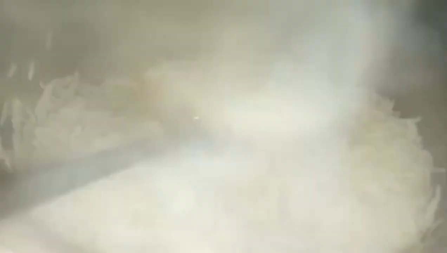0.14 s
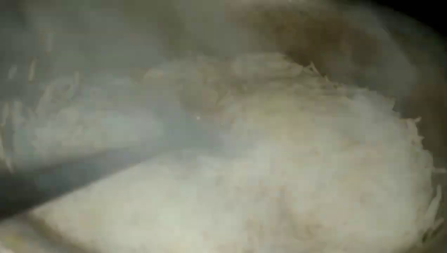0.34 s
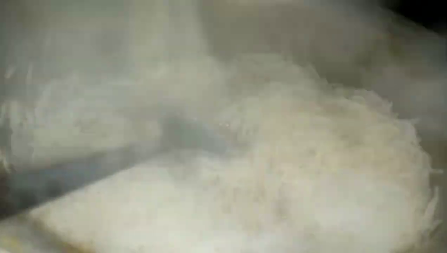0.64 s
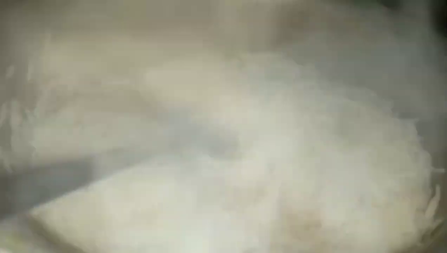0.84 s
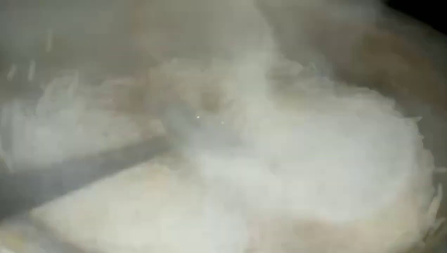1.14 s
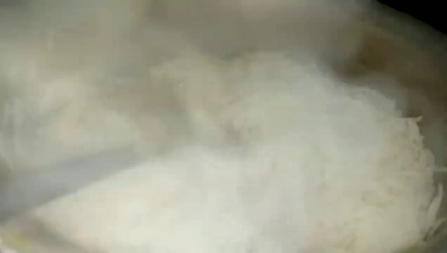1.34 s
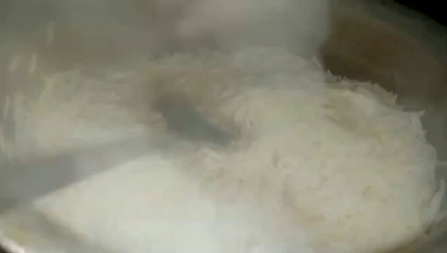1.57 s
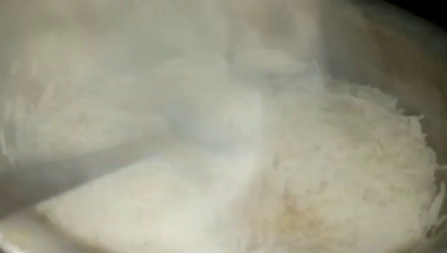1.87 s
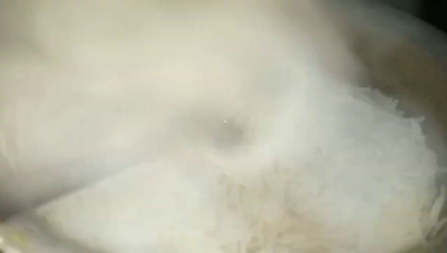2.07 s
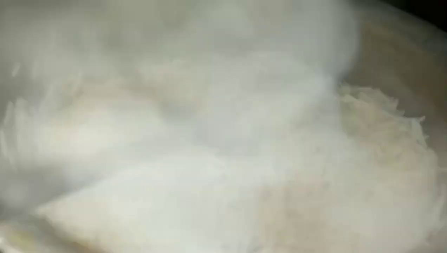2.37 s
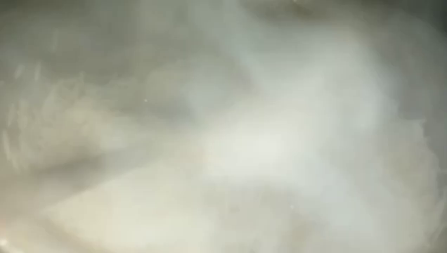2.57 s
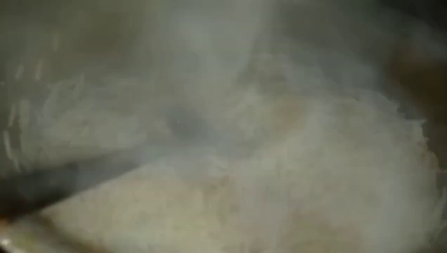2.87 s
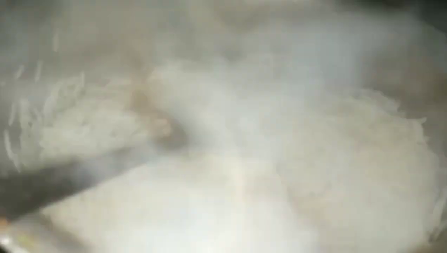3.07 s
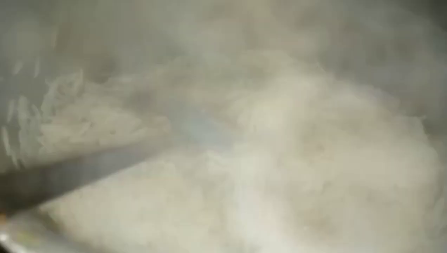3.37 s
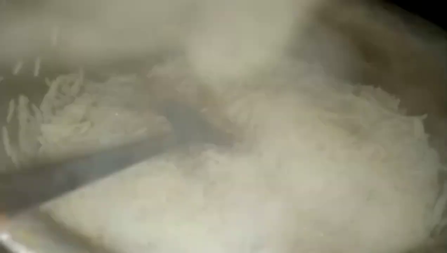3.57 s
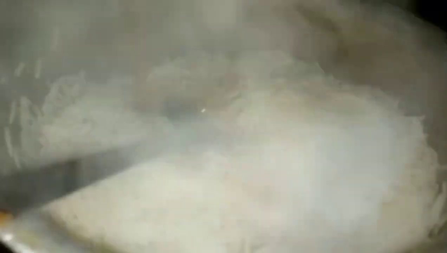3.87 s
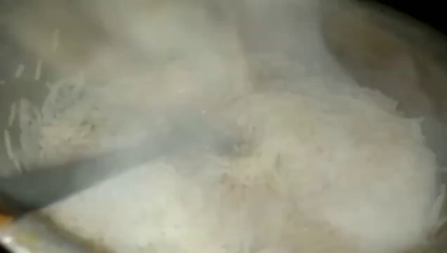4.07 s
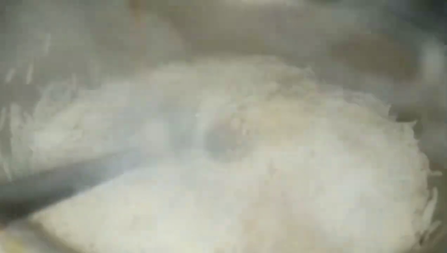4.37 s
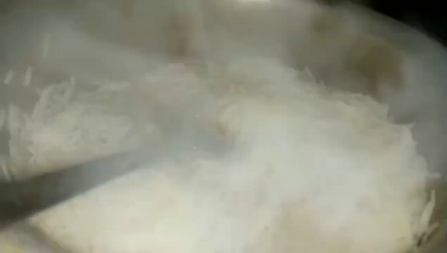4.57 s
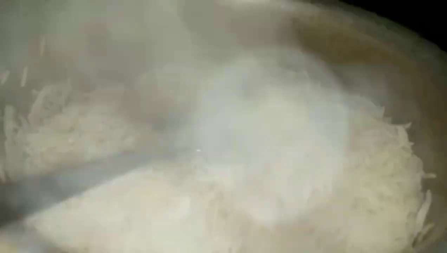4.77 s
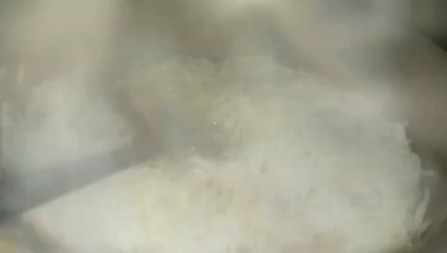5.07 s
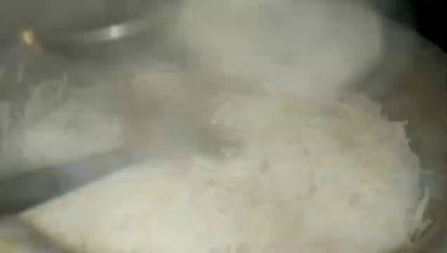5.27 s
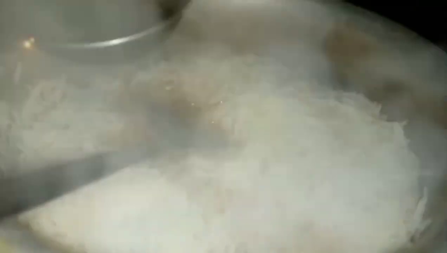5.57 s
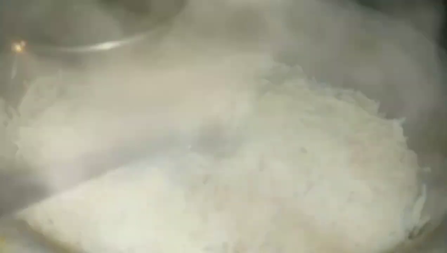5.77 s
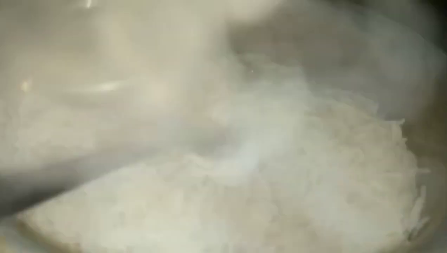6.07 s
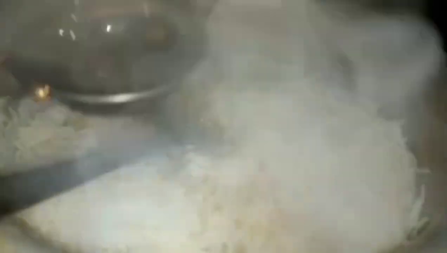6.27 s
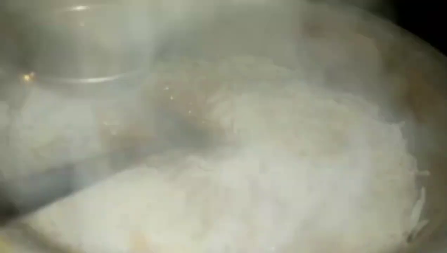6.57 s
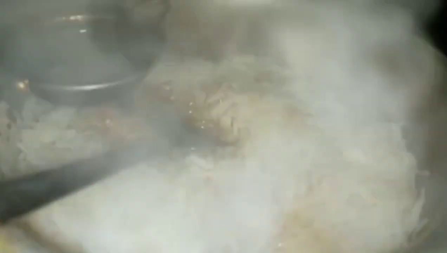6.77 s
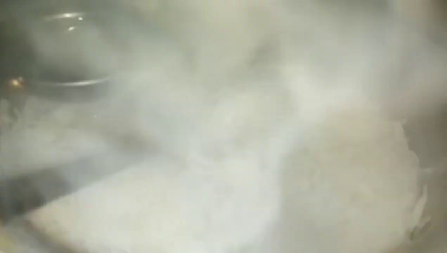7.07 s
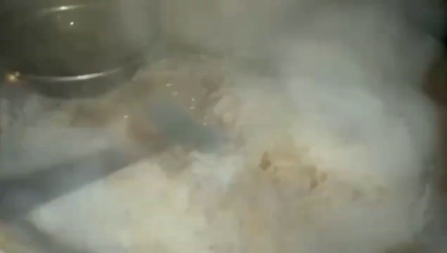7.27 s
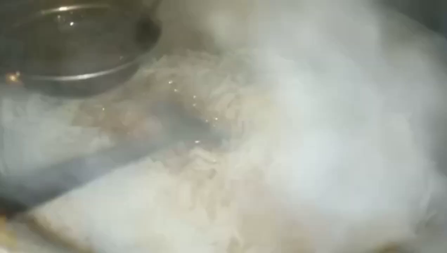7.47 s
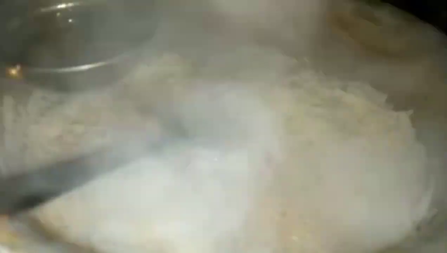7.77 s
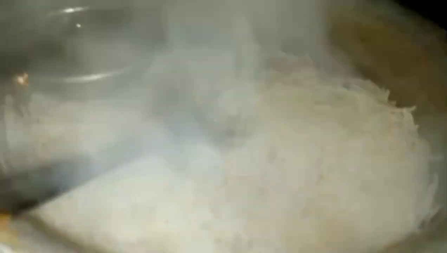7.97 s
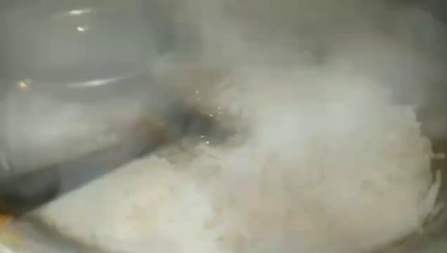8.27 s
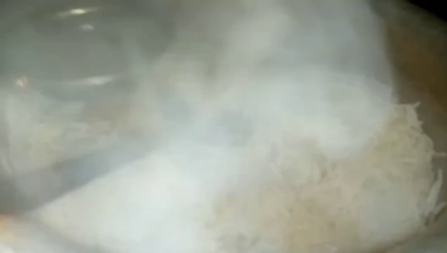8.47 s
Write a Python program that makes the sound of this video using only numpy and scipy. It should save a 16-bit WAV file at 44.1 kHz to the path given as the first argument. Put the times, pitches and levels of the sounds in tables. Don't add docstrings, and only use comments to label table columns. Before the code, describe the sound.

Close handheld capture in a home kitchen: soft burner roar and steam hiss under everything. First only tiny clicks and slides of grain, then six evenly spaced, ringing knocks of metal on a steel pot, with quick chattering bounces. A pause, then a rapid run of hard, short bowl taps shedding spice, bumping the microphone and popping it once, followed by weaker scattered taps and a last trickle of grains.

```python
import sys
import numpy as np
from scipy import signal
from scipy.fft import rfft, irfft, next_fast_len
from scipy.io import wavfile
from scipy.ndimage import uniform_filter1d, map_coordinates

SR = 44100
rng = np.random.default_rng(int(sys.argv[2]) if len(sys.argv) > 2 else 0)


def makeup_ratio(level_db):
    decades = np.asarray(level_db, float) / 20
    return 10 ** decades


def transcribe(signal):
    frames = np.atleast_2d(signal).T
    limited = np.clip(frames, -1, 1)
    pcm = np.round(limited * 32767).astype(np.int16)
    wavfile.write(sys.argv[1], SR, pcm)


N = 381004

# time_s, burner_db
BURNER = [(0, -57), (2.7, -56.5), (4.8, -55), (6.5, -55.5), (8.0, -54.5), (8.64, -55)]
# time_s, rumble_db
HANDLING = [(0, -65.5), (.8, -71.5), (2.7, -66.5), (4.5, -72), (4.85, -60.5), (5.2, -72), (5.5, -54),
            (5.7, -71), (6, -57), (6.45, -67.5), (7.1, -63), (8.64, -65)]
# frequency_hz, density_db
RUMBLE = [(15, -66), (25, -18), (65, -15.5), (92, -3), (124, -4.5), (167, 1.5), (243, -19.5), (350, -8.5),
          (460, -27), (770, -120)]
# frequency_hz, density_db
FLAME = [(180, -23), (300, -13.5), (318, -11), (395, -2.5), (519, -5), (683, 3), (1070, -11.5), (1270, 1),
         (1590, -5), (1740, -6), (1890, 0), (2020, -4), (2980, -7), (3750, -9.5), (4600, -18), (5980, -31),
         (10100, -120)]
# frequency_hz, density_db
STEAM = [(2590, -19), (4400, -1.5), (5460, -0.5), (7320, 1.5), (8270, -7.5), (9280, -15), (11100, -9),
         (12800, -16), (14100, -25), (14600, -1), (15400, -8.5), (16000, -20), (16500, -24)]
# frequency_hz, width_hz, level_db
JET = [(3850, 170, 0)]
STEAM_DB, STEAM_FOLLOWS = -63, 0.33

# start_s, clack_db, landing_db, sliding_db
TAPS = [(1.187, -48, -60, -47), (5.439, -9, -16, -25), (5.737, -16.5, -17.5, -24.5),
        (5.9767, -16.5, -21.5, -27.5), (6.1802, -11, -20, -31), (6.3928, -23.5, -25, -26.5),
        (6.5971, -20.5, -25.5, -35.5), (6.9733, -43.5, -60, -45), (7.1568, -32, -35, -38),
        (7.3296, -34.5, -34.5, -47), (7.8076, -49, -62, -49), (8.1704, -44, -44, -34),
        (8.344, -32.5, -43, -32), (8.512, -36.5, -49, -35)]
# start_s, peak_db
SKIPS = [
    (5.452, -19),
    (5.4826, -22.5),
    (5.7436, -18),
    (5.987, -20.5),
    (6.398, -21.5),
    (7.1684, -32.5),
    (8.1285, -39),
    (8.549, -39),
    (8.558, -38),
]
# start_s, peak_db
TICKS = [
    (.0135, -45),
    (0.0297, -35.5),
    (5.467, -17.5),
    (6.22, -30),
    (6.437, -24.5),
]
# start_s, peak_db
TILTS = [
    (0.001, -38.5),
    (.028, -41),
    (.2289, -39.5),
    (8.3944, -38),
    (8.548, -27),
    (8.5742, -36),
]
# start_s, peak_db, centre_hz, rise_s, t60_s
SETTLING = [
    (.67, -42, 2130, 0.012, 0.15),
    (1.709, -43.5, 4400, 0.0074, 0.19),
    (2.18, -41.5, 1440, 0.0042, 0.073),
    (8.5, -38, 613, 0.0046, 0.061),
]
# start_s, peak_db, pitch_hz
STRAYS = [
    (.003, -39, 5200),
    (.0285, -37, 5150),
    (.0455, -35, 7400),
    (0.245, -34, 5700),
    (.2605, -34, 6400),
    (7.8085, -37, 1500),
]
# frequency_hz, width_hz, level_db
BOWL = [(1310, 310, -5), (2110, 400, -3.5), (4380, 480, 0), (6350, 1460, -1.5), (7590, 500, 4),
        (9080, 840, -12), (11440, 650, -12), (14900, 1750, -7)]
FLIGHT_S = 0.018
SOFT_RING_DB, HARD_DB = (-6.5, -3), -28  # (low, middle) ring of a soft tap; taps above HARD_DB brighten
BRIGHTEN = (0.62, 0.47)
SKIP_RING_DB, LANDING_RING_DB = (-8, -5.5), (-21, -21)
SLIDE_HZ, SLIDE_HZ_PER_DB, SLIDE_RISE_S, SLIDE_T60_S = 6770, 40, 0.011, 0.17
TRICKLE_DB, TRICKLE_T60_S = -24, 0.97
STRAY_CYCLES = 13

# start_s, peak_db, glance (0 square to 1 grazing)
KNOCKS = [(2.3826, -28.5, 0.045), (2.4135, -46, .6), (2.4894, -49, 0.52), (2.8427, -25.5, 0.16),
          (2.8685, -33, 0.57), (3.336, -27, 0.09), (3.3435, -33, .3), (3.3634, -32, 1),
          (3.7316, -25.5, 0.18), (3.7408, -24, 0.13), (3.7655, -28.5, .8), (4.1063, -21, 0.024),
          (4.1116, -27.5, 0.14), (4.1693, -31, .9), (4.4692, -24.5, 0.13), (4.4767, -21.5, 0.34)]
# first_spot_db, second_spot_db, t60_s
STEEL = [(-33.0, -22.0, 0.44), (-22, -22, 0.25), (-34.0, -47.0, 1.5), (-32.0, -31.0, 1.1),
         (-25.0, -29.0, 0.61), (-33.0, -37.0, 1.5), (-23.0, -23.0, 0.59), (-20.0, -22.0, 0.57),
         (-13.0, -14.0, 0.54), (-22.0, -20.0, 0.72), (-25.0, -26.0, 0.54), (-27.0, -23.0, 0.66),
         (-17.0, -19.0, 0.42), (-25.0, -29.0, 0.56), (-13.0, -12.0, 0.65), (-14.0, -20.0, 0.52),
         (-13.0, -9.0, 0.38), (-19.0, -14.0, 0.42), (-16.0, -16.0, 0.44), (-8.0, -9.0, 0.41),
         (-24.0, -19.0, 0.53), (-9.0, -14.0, 0.36), (-19.0, -12.0, 0.47), (-17.0, -19.0, 0.5),
         (-15.0, -9.0, 0.34), (-20.0, -19.0, 0.55), (-18.0, -21.0, 0.57), (-13.0, -10.0, 0.37),
         (-17.0, -26.0, 0.39), (-11.0, -12.0, 0.42),
         (-21, -19, 0.4), (-19, -21, 0.5), (-20, -15, 0.39), (-24, -21, 0.49), (-44, -27, 0.56),
           (-30, -22, 0.41), (-33, -19, 0.41), (-23, -13, 0.44), (-17, -12, 0.4), (-25, -23, 0.44),
           (-20, -16, 0.41), (-21, -9, 0.33), (-15, -13, 0.44), (-21, -23, 0.56), (-22, -12, 0.38),
           (-21, -17, 0.45), (-17, -19, 0.42), (-25, -19, 0.41), (-20, -26, 0.5), (-25, -22, 0.44),
           (-23, -25, 0.42), (-22, -22, 0.43), (-27, -22, 0.41), (-24, -23, 0.37), (-22, -14, 0.37),
           (-30, -32, 0.56), (-21, -26, 0.37), (-22, -23, 0.35), (-21, -19, 0.35), (-29, -38, 0.42)]
STEEL_LOW_HZ = [622, 668, 929, 1023, 1125, 1336, 1653, 2211, 2270, 2328, 2405, 2639, 2672, 2752, 2854, 3061, 3106,
                3168, 3254, 3282, 3373, 3648, 3703, 3755, 3928, 4102, 4130, 4174, 4346, 4417]
STEEL_HIGH_HZ = [4768, 5030, 5062, 5117, 5278, 5343, 5388, 5450, 5742, 5840, 5869, 5899, 6094, 6186, 6280,
                 6392, 6424, 6628, 6712, 6835, 7496, 7522, 7548, 7580, 7638, 7681, 8115, 8170, 8278, 9078]
# frequency_hz, density_db
CLANG = [(150, -62), (250, -42), (644, -13), (823, -55), (1110, -3), (1490, -23), (1600, -6), (1780, -12.5),
         (2200, -2), (4060, -6), (4750, -10), (6290, -1.5), (12200, -17.5), (15100, -6), (16500, -32)]
# frequency_hz, width_hz, level_db
GRIPPED_FIRST = [(668, 89, -13), (1120, 88, -12), (1660, 86, -10), (2270, 99, -7), (2660, 91, -6),
                 (3280, 80, 1), (3770, 97, -3), (4430, 87, -6), (4780, 78, -12), (6080, 130, 0),
                 (7640, 180, -9), (8050, 98, -9)]
# frequency_hz, width_hz, level_db
GRIPPED_SECOND = [(662, 32, -11), (1660, 25, -8), (3280, 150, -7), (3770, 44, -3), (4170, 81, 0),
                  (5040, 48, -10), (5460, 30, -9), (6260, 120, -2), (6650, 33, -5), (6850, 26, -5),
                  (7630, 34, -5), (8180, 31, -9)]
SECOND_SPOT_S = 3.6
SQUARE_DB = (6, -1, 7)
GRAZE_DB = (-30, 0.5, -2.5)
LINGER_DB, TO_ROOM = -4, 0.32
SWELL_S, LOW_DAMPING = 0.011, 0.79

# start_s, peak_db
THUDS = [(4.814, -53), (5.129, -49), (5.437, -40), (5.739, -33), (5.799, -45), (5.978, -38), (6.18, -32.5),
         (6.394, -41.5), (6.597, -43.5), (6.838, -53.5), (7.014, -59.5), (7.163, -48.5), (7.334, -44.5),
         (7.51, -49), (7.66, -45), (7.835, -40), (8.015, -39.5), (8.213, -45), (8.579, -40.5)]
THUD_HZ, THUD_T60_S = 169.5, 0.21
FIRM_DB, SHORTER_PER_DB = -40, 0.36
POP_S, POP_DB, PUSH_S, RELEASE_S = 5.8038, -13.5, 0.00055, 0.0012

# frequency_hz, t60_s
KITCHEN = [(150, 1), (800, 0.14), (2000, 0.36), (6000, 0.39), (10000, 0.28), (15000, 0.24)]
# frequency_hz, level_db
MICROPHONE = [(8500, -2), (12600, -7.5), (14500, -10.5), (15750, -2), (15950, -24), (16900, -34)]
TOP_HZ = 16900


def unit(x):
    return x / np.sqrt(np.mean(x ** 2) + 1e-20)


def along(points, hz):
    f, v = np.transpose(points)
    return np.interp(np.log(hz + 1), np.log(f + 1), v)


def curve(rows):
    return np.interp(np.arange(N) / SR, *np.transpose(rows))


def seconds(length):
    return np.arange(int(length * SR)) / SR


def filtered(x, response):
    m = next_fast_len(len(x) + 4096)
    return irfft(rfft(x, m) * response(np.fft.rfftfreq(m, 1 / SR)), m)[:len(x)]


def resonances(peaks):
    def response(f):
        total = 0
        for k, (centre, width, db) in enumerate(peaks):
            damping = 1j * f * width
            total = total + (-1) ** k * makeup_ratio(db) * damping / (centre * centre - f * f + damping)
        return total
    return response


def noise(size, spectrum):
    return unit(filtered(rng.standard_normal(size), lambda hz: makeup_ratio(along(spectrum, hz))))


def wobble(rate):
    return map_coordinates(rng.standard_normal(int(N * rate / SR) + 4), [np.arange(N) * rate / SR])


def add(track, s, sound):
    part = track[max(round(s * SR), 0):][:len(sound)]
    part += sound[:len(part)]


def in_kitchen(dry, wet_db, gap=0.0023):
    hz, t, z = signal.stft(rng.standard_normal(SR // 2), SR, nperseg=256)
    decay = makeup_ratio(-60 * t / along(KITCHEN, hz)[:, None])
    tail = signal.istft(z * decay, SR, nperseg=256)[1]
    tail = tail * (1 - np.exp(-np.arange(len(tail)) / (gap * SR)))
    wet = signal.fftconvolve(dry, makeup_ratio(wet_db) * tail / np.linalg.norm(tail))
    add(wet, 0, dry)
    return wet


def patchy(spectrum, patchy_db):
    z = signal.stft(noise(N, spectrum), nperseg=512)[2]
    field = uniform_filter1d(rng.standard_normal(z.shape), size=10, axis=1)
    field = uniform_filter1d(field, size=4, axis=0)
    return unit(signal.istft(z * makeup_ratio(patchy_db * unit(field)), nperseg=512)[1][:N])


def stove():
    rumble_db, flame_db = curve(HANDLING), curve(BURNER)
    steam_db = STEAM_DB + STEAM_FOLLOWS * (flame_db - flame_db.mean())
    rumble = makeup_ratio(rumble_db + 3.5 * wobble(12)) * noise(N, RUMBLE)
    flame = makeup_ratio(flame_db + 0.6 * wobble(12)) * patchy(FLAME, patchy_db=0.6)
    steam = makeup_ratio(steam_db + 0.4 * wobble(6)) * patchy(STEAM, patchy_db=0.5)
    jets = makeup_ratio(flame_db - 10.5) * unit(filtered(rng.standard_normal(N), resonances(JET)))
    return rumble + flame + jets + steam


def slides():
    rows = [(s, db, SLIDE_HZ) for s, db in TILTS]
    for s, tap_db, _, db in TAPS:
        hz = SLIDE_HZ + SLIDE_HZ_PER_DB * max(tap_db - HARD_DB, 0)
        rows.append((s + FLIGHT_S, db, hz))
    return [(*row, SLIDE_RISE_S, SLIDE_T60_S) for row in rows]


def grains():
    out, t = np.zeros(N), seconds(0.34)
    for s, db, hz, rise, t60 in slides() + SETTLING:
        fine_db = -18 - 25 * (hz < 5000)
        lumps = unit(uniform_filter1d(rng.standard_normal(len(t)), size=70))
        ticks = rng.standard_normal(len(t)) * makeup_ratio(2.8 * lumps)
        bands = [(0.19 * hz, 0.25 * hz, -12), (0.59 * hz, 0.25 * hz, -9),
                 (hz, 0.15 * hz, 0), (15000, 1000, fine_db)]
        hiss = filtered(ticks, resonances(bands))
        hiss = filtered(hiss, lambda f: makeup_ratio(-9 * np.exp(-((f - 1.58 * hz) / (0.62 * hz)) ** 2)))
        decay = makeup_ratio(-60 * t / t60) + makeup_ratio(TRICKLE_DB - 60 * t / TRICKLE_T60_S)
        swell = 1 - np.exp(-t / abs(rise))
        add(out, s, makeup_ratio(db - 5.5) * decay * swell * unit(hiss))
    return out


def strays():
    out, t = np.zeros(N), seconds(0.02)
    for s, db, hz in STRAYS:
        click = makeup_ratio(db - 60 * t * hz / STRAY_CYCLES) * np.sin(2 * np.pi * hz * t)
        add(out, s, in_kitchen(click, wet_db=-2))
    return out


def contacts():
    rows = []
    for s, db, landing_db, _ in TAPS:
        ring_db = np.array(SOFT_RING_DB) - max(db - HARD_DB, 0) * np.array(BRIGHTEN)
        rows.append((s, db, *ring_db))
        rows.append((s + FLIGHT_S, landing_db, *LANDING_RING_DB))
    rows += [(s, db, *LANDING_RING_DB) for s, db in TICKS]
    return rows + [(s, db, *SKIP_RING_DB) for s, db in SKIPS]


def bowl():
    out, t = np.zeros(N), seconds(0.06)
    for s, db, low_db, middle_db in contacts():
        blow = rng.standard_normal(len(t)) * makeup_ratio(-60 * t / 0.024) * (1 - np.exp(-t / 0.00094))
        parts = [filtered(blow, resonances(part)) for part in (BOWL[:2], BOWL[2:3], BOWL[3:])]
        low, middle, high = [part / np.abs(part).max() for part in parts]
        clack = makeup_ratio(low_db) * low + makeup_ratio(middle_db) * middle + high
        add(out, s, in_kitchen(makeup_ratio(db) * clack, wet_db=-8, gap=0.018))
    return out


def ring(modes, db, scatter_db):
    size, turn = rng.standard_normal(len(db)), rng.random(len(db))
    return np.imag((makeup_ratio(db + scatter_db * size) * np.exp(2j * np.pi * turn)) @ modes)


def pot():
    out, t = np.zeros(N), seconds(0.7)
    hz = np.array(STEEL_LOW_HZ + STEEL_HIGH_HZ)
    low, high = hz < 1900, hz > 4600
    first_db, second_db, heard_t60 = np.transpose(STEEL)
    heard_t60 = heard_t60 * np.where(low, LOW_DAMPING, 1)
    t60 = heard_t60 * np.clip(heard_t60 / 0.61, 0.45, 1)
    early = makeup_ratio(-60 * t / t60[:, None]) * np.sqrt(heard_t60 / t60)[:, None]
    late = makeup_ratio(LINGER_DB - 60 * t / heard_t60[:, None])
    modes = (early + late) * np.exp(2j * np.pi * hz[:, None] * t)
    swell = 1 - 0.75 * np.exp(-t / SWELL_S)
    contact = 1 - np.exp(-t / 0.0007)
    for s, db, glance in KNOCKS:
        low_db, high_db, clang_db = np.array(SQUARE_DB) + np.clip(glance, 0, 1) * np.array(GRAZE_DB)
        spot_db, gripped = (second_db, GRIPPED_SECOND) if s > SECOND_SPOT_S else (first_db, GRIPPED_FIRST)
        steel = ring(modes, spot_db + low * low_db + high * high_db, scatter_db=1.5) * swell
        chatter = rng.standard_normal(len(t)) * makeup_ratio(-60 * t / 0.035)
        chatter[8] = 5
        thunk = filtered(chatter, resonances(gripped))
        clang = noise(len(t), CLANG) * (makeup_ratio(-2.5 - 60 * t / 0.051) + makeup_ratio(-20 - 60 * t / 0.24))
        clang = clang + makeup_ratio(7.5) * thunk / np.abs(thunk).max()
        blow = makeup_ratio(db) * (makeup_ratio(-2) * TO_ROOM * steel + makeup_ratio(clang_db) * clang) * contact
        add(out, s, makeup_ratio(db - 2.5) * (1 - TO_ROOM) * steel * contact)
        add(out, s, in_kitchen(blow, wet_db=-4))
    return out


def thuds():
    out, t = np.zeros(N), seconds(0.16)
    for s, db in THUDS:
        t60 = THUD_T60_S / (1.5 + SHORTER_PER_DB * max(db - FIRM_DB, 0))
        rub = noise(len(t), [(60, -29), (110, -8), (230, 21.0), (400, -29.0)])
        bump = np.sin(2 * np.pi * THUD_HZ * t) + 0.51 * rub
        add(out, s, makeup_ratio(db - 60 * t / t60) * (1 - np.exp(-t / 0.0026)) * bump)
    return out


def pop():
    t = seconds(0.03)
    after = np.maximum(t - PUSH_S, 0) / RELEASE_S
    press = -np.minimum(2 * t / PUSH_S, 1)
    rebound = 0.43 * (1 - 0.37 * after) * np.exp(-0.55 * after)
    pressure = np.where(t < PUSH_S, press, rebound)
    pressure = pressure + filtered(pressure, resonances([(6200, 960, 9.8), (15000, 2170, 1.2)]))
    pressure = filtered(pressure, lambda f: 1j * f / (90 + 1j * f))
    out = np.zeros(N)
    add(out, POP_S, makeup_ratio(POP_DB) * pressure)
    return out


def scene():
    return (stove() + grains() + strays() + bowl() + pot() + thuds() + pop())[None]


def band_limit(x):
    return signal.sosfilt(signal.butter(12, 17030, fs=SR, output="sos"), x)


def record(dry):
    heard = filtered(dry[0], lambda hz: makeup_ratio(along(MICROPHONE, hz)) * (hz < TOP_HZ))
    return band_limit(heard[None])


dry = scene()
out = record(dry)
transcribe(out)
```